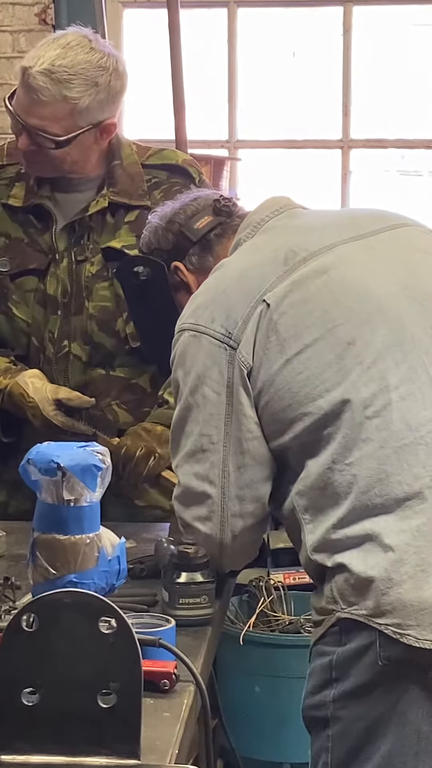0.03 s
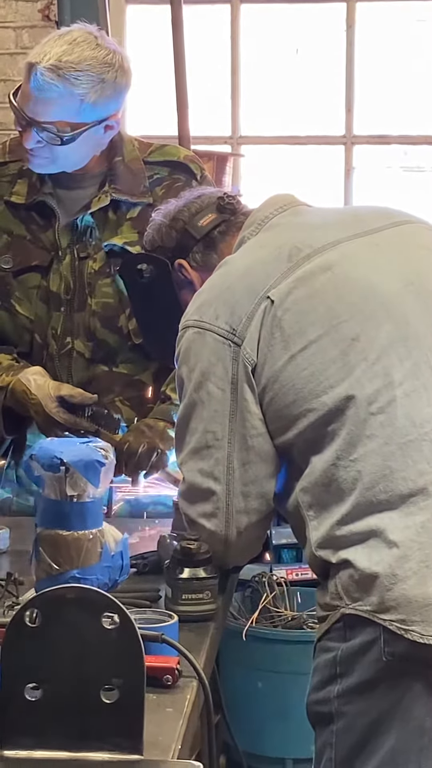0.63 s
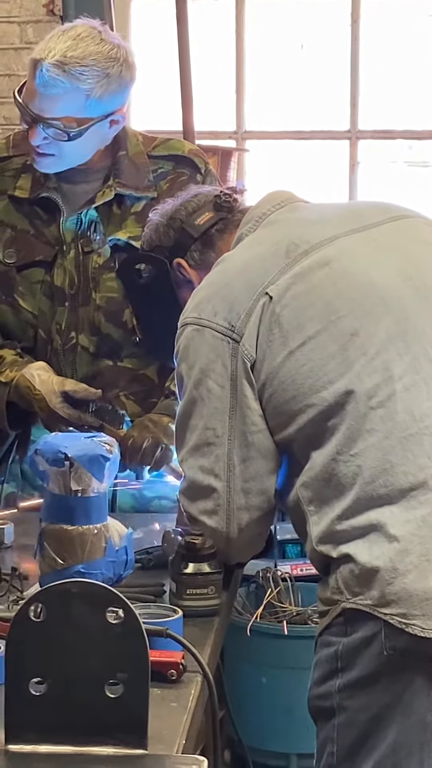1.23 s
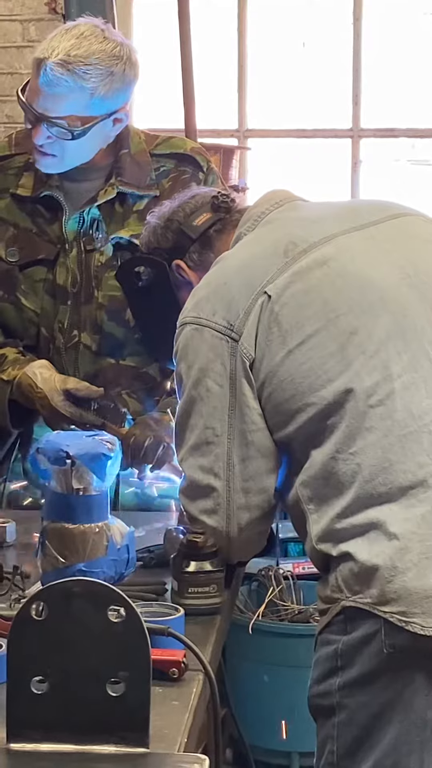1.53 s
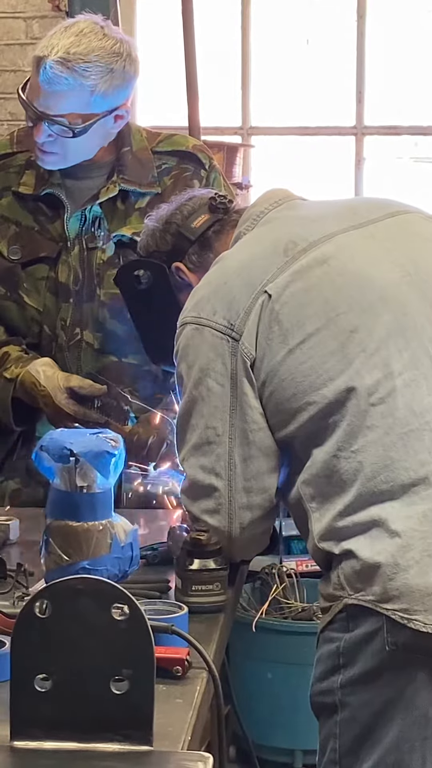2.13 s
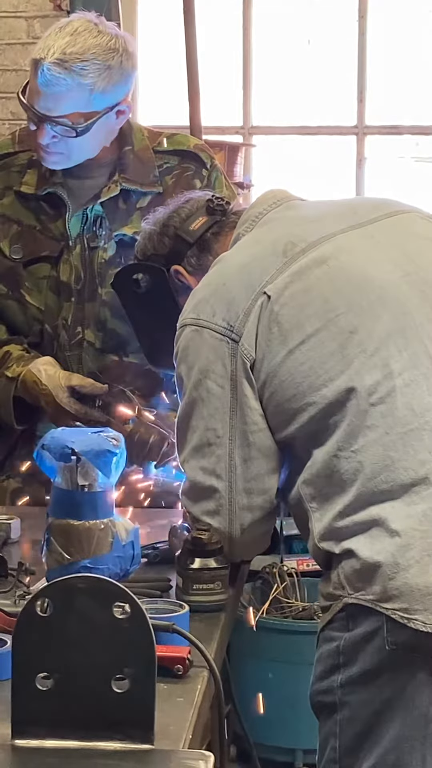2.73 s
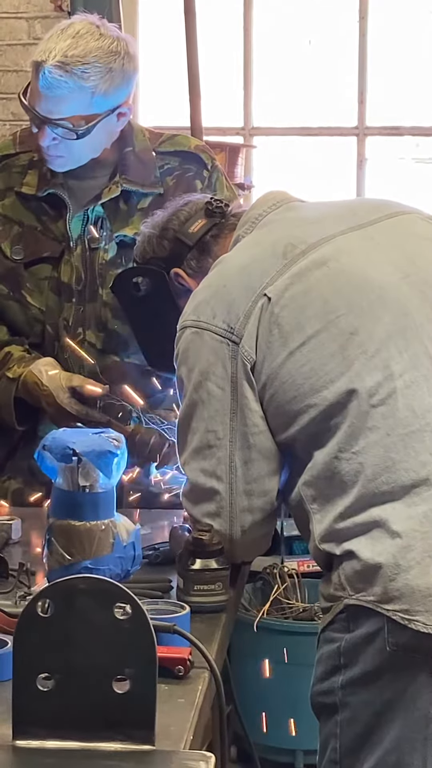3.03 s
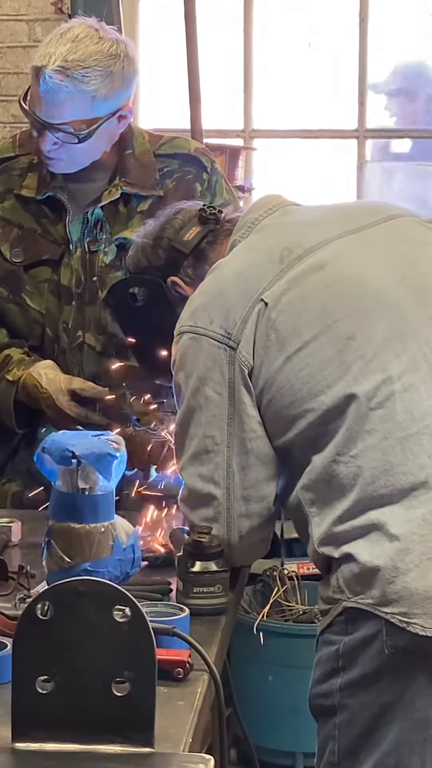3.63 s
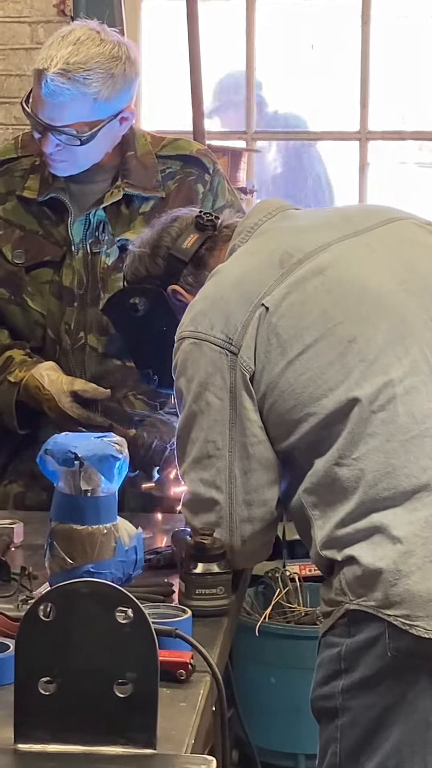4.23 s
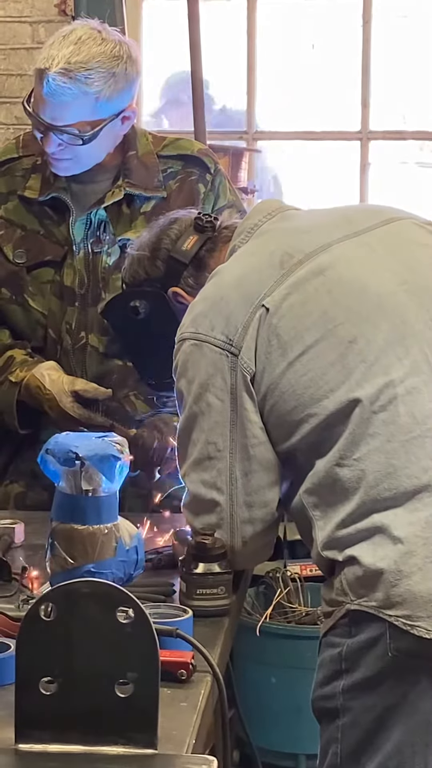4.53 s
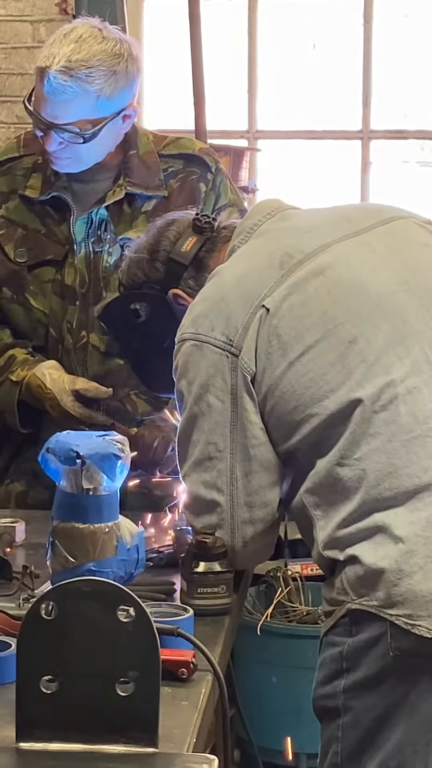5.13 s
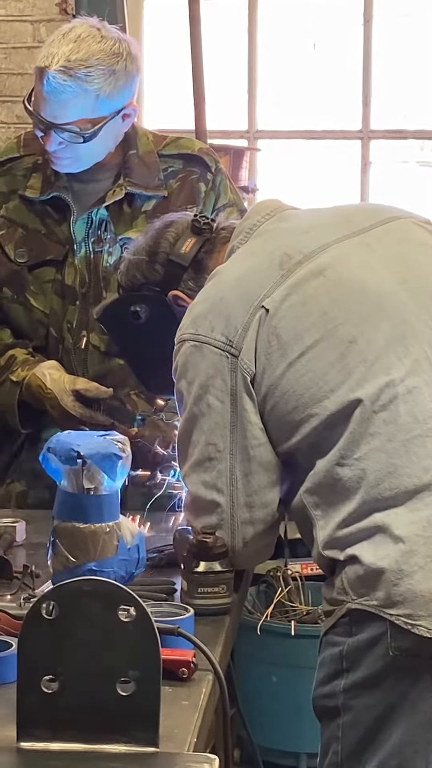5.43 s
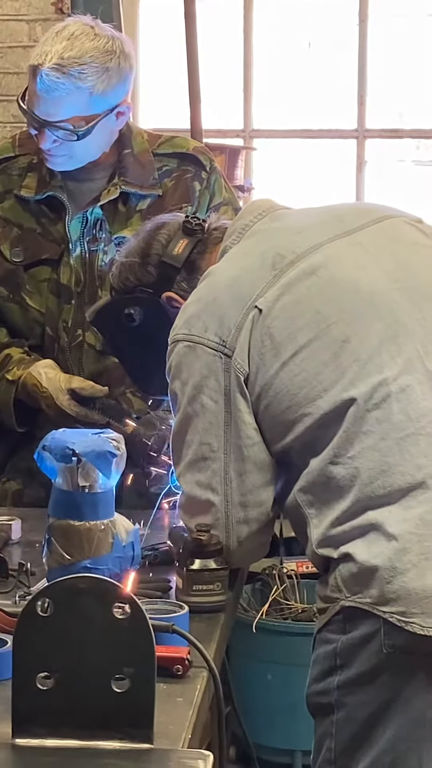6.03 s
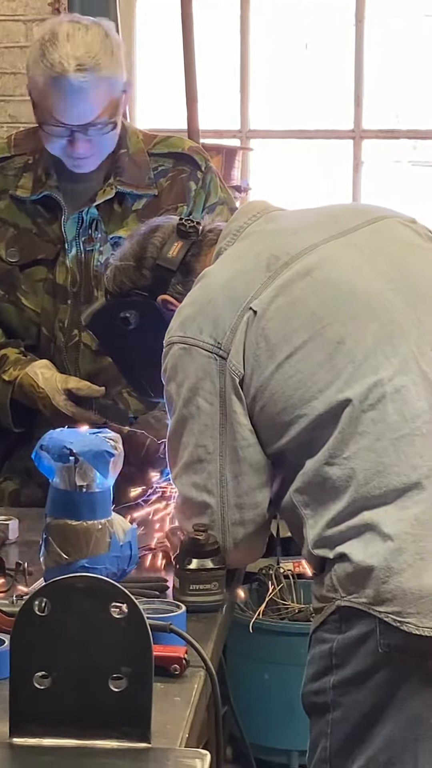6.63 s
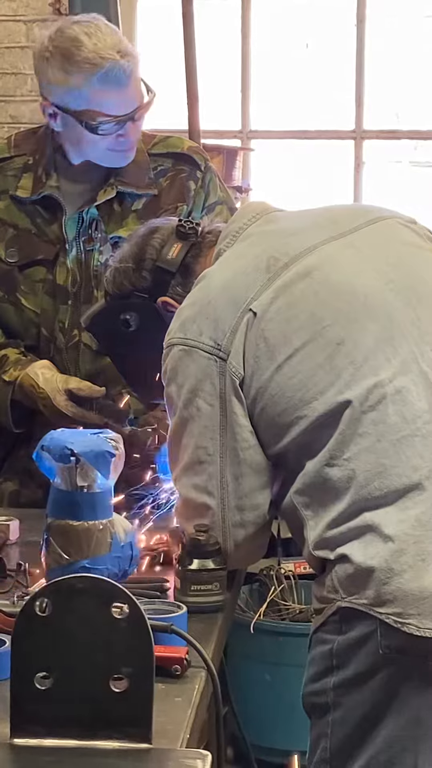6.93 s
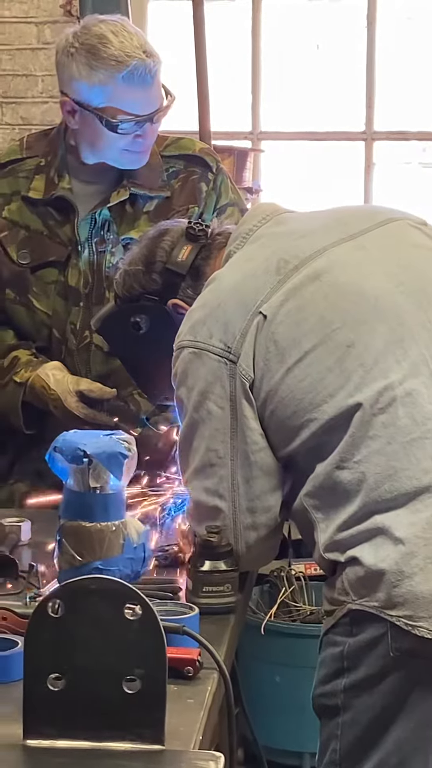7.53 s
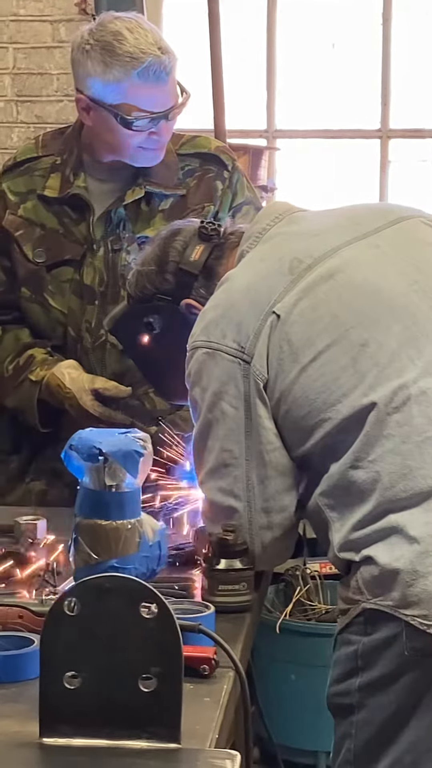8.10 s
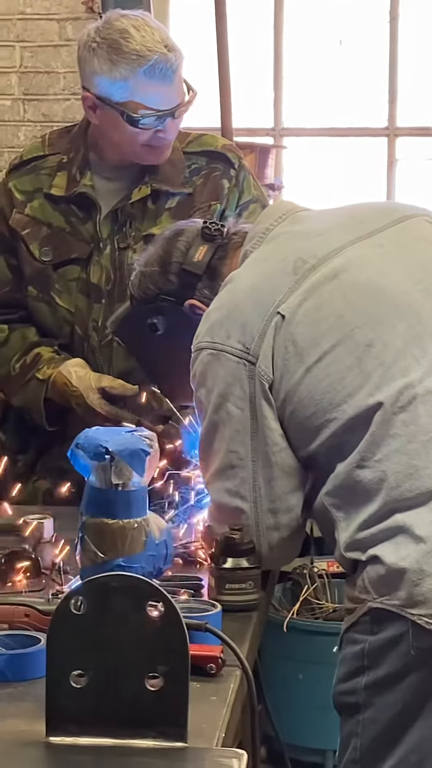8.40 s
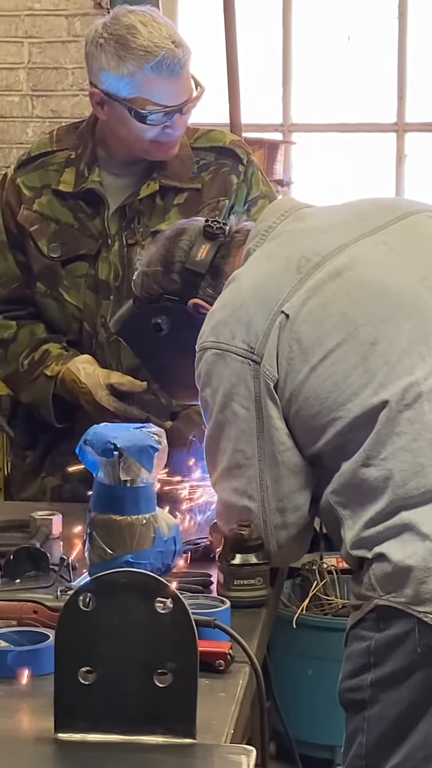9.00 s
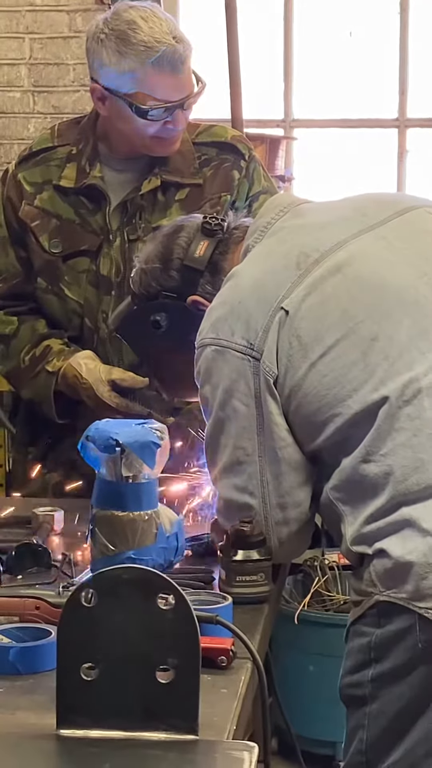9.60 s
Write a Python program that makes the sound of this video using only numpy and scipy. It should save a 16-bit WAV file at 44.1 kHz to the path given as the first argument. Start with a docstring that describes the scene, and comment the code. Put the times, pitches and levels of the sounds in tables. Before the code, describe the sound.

An electric welder strikes an arc and crackles and sizzles steadily, with popping spatter over a faint machine hum.

```python
"""A workshop with a steel bench. A wire welder strikes an arc and lays one long bead, half hidden behind
the person welding. Each short circuit snaps, the melt sizzles between snaps and drops of spatter burst.
Bench clutter scatters the crackle into the room; narrow resonances colour it. The machine's fan and a
motor hum underneath. A low thud dies away as the arc catches; fainter ones follow."""
import sys
import numpy as np
from scipy import signal
from scipy.fft import rfft, irfft, next_fast_len
from scipy.io import wavfile
from scipy.ndimage import uniform_filter1d

SR = 44100
rng = np.random.default_rng(int(sys.argv[2]) if len(sys.argv) > 2 else 0)


def unload_audio(sound):
    """Save the sound as a 16-bit wav file, at the path given as the first command line argument."""
    columns = np.transpose(np.atleast_2d(sound))
    # keep every value between -1 and 1, then stretch to whole-number steps
    steps = np.round(np.clip(columns, -1, 1) * 32767)
    wavfile.write(sys.argv[1], SR, steps.astype(np.int16))


N = 430416
TIME_S = np.arange(N) / SR
FFT_SIZE = next_fast_len(N + SR)
FREQ_HZ = np.fft.rfftfreq(FFT_SIZE, 1 / SR)

# Wire touches, arc goes out again. Each row: start in seconds, level in dB, fade in dB per second.
FALSE_STARTS = [(.123, -33, 450), (0.1438, -30, 108), (0.2255, -32.5, 69)]
# Steady burn. Each row: time in seconds, crackle level in dB, sputter level in dB.
BURN_LEVELS = [(0.4, -30.5, -34.5), (0.9, -32.5, -37), (2.3, -29.5, -37), (3.5, -32, -35), (4.1, -31, -39),
               (5.2, -29, -36.2), (7.3, -30, -38), (8.25, -32, -37), (8.7, -31, -36.5), (9.76, -27, -36)]
# Arc flares. Each row: peak time in seconds, width in seconds, crackle rise in dB, sputter rise in dB.
ARC_FLARES = [(0.87, 0.06, 0.5, 2.5), (1.184, 0.1, 4, 2.5), (1.493, 0.1, 1.5, 2.5), (1.844, 0.19, 2.5, 4),
              (2, 0.086, 5, 2.5), (2.6, 0.2, 2.5, 2.5), (2.928, 0.11, 4.5, 2.5), (3.172, 0.13, 3, 1.5),
              (3.308, 0.12, 7, 2.5), (3.444, 0.04, 8, 3.5), (3.633, 0.027, 9.5, -1), (3.67, 0.22, 1.5, 0.5),
              (4.08, 0.09, 1.5, 1), (4.745, 0.24, 2, 3.5), (5.48, 0.11, 0.5, 3.5), (5.703, 0.17, 2, 3),
              (5.96, 0.17, 0, 1.5), (6.2, 0.084, 3.5, 0.5), (6.276, 0.11, 3.5, 2.5), (6.4, 0.19, -1.5, 2.5),
              (6.623, 0.16, 3.5, 3.5), (6.965, 0.16, 2.5, 2.5), (7.12, 0.26, -0.5, 4.5),
              (7.23, 0.2, 1.8, 1.3), (7.488, 0.25, 4.5, 3.5), (7.648, 0.068, 2.5, 1), (7.948, 0.18, 3.5, 2),
              (8.088, 0.11, 7, 2), (8.474, 0.21, 2.5, 2.5), (8.624, 0.14, 6, 4.5), (8.985, 0.41, 4.5, 3),
              (9.287, 0.17, 3, 4.5)]
# Top treble against the rest of the crackle. Each row: time in seconds, gain in dB.
SPIT_GAINS = [(0.15, 3), (0.36, -5), (0.55, 3), (0.95, -1), (1.35, -3.5), (2.5, -4.5), (3.3, -2.5),
              (4.5, -2), (5.7, -1), (6.9, 1), (7.2, 0), (7.5, 0.7), (8.2, 0.5), (9.76, 0)]
# Spark colour. Each row: frequency in Hz, gain at bead start in dB, gain at bead end in dB.
SPARK_SPECTRUM = [(120, -14, -20.5), (356, -5, -3), (417, -6, -3.5), (458, -11.5, -7), (500, -4.5, -3),
                  (586, -5.5, -3), (693, 1.5, -3), (817, 2, 2), (1007, -5, -7), (1395, 0.8, 3),
                  (1720, -5, 1), (1980, -4.5, -2), (2180, -3.5, -2), (3130, -0.6, -0.2), (3660, -5.5, -1.5),
                  (3910, -1, -2.5), (4850, 0.8, -2.5), (5770, 2.5, -5), (7240, -1.5, -5), (8710, 3.5, 0.5),
                  (9900, -2, -3.5), (10560, -0.5, 2.5), (13100, -2, -8.5), (14800, -3, -6),
                  (15700, -8, -6.5)]
# Wire striking the plate, then large drops bursting. Each row: start in seconds, level in dB.
SPATTER_POPS = [ (0.1228, -11), (0.1447, 1), (0.2255, -11), (0.3218, -3), (0.3373, -6), (0.404, -6),
                (0.486, -6), (0.5345, -5), (0.6059, -6), (1.1536, -8), (1.1826, -6), (1.5012, -8),
                (1.9925, -6), (2.1213, -9), (2.1356, -7), (2.1845, -7), (2.5873, -7), (2.8446, -7),
                (2.9133, -7), (3.1457, -7), (3.6281, -6), (3.6382, -5), (5.4085, -8), (6.2795, -5),
                (6.5947, -7), (6.9797, -7), (7.379, -6), (7.4433, -8), (7.48, -5), (7.6363, -8),
                (7.9481, -7), (7.9632, -7), (8.0817, -5), (8.4551, -5), (8.5898, -8), (8.7139, -5),
                (8.8118, -6), (8.8781, -5), (8.955, -6), (9.3019, -5), (9.3768, -8), (9.421, -5),
                (9.5015, -8), (9.5178, -8), (9.6066, -4), (9.7256, -6)]
# Molten pool spitting. Each row: start in seconds, level in dB.
POOL_PLOPS = [(0.1228, -13), (0.1447, -8), (0.3373, -13), (0.8519, -13), (3.4441, -11), (3.6365, -11),
              (4.4947, -14), (6.2237, -12), (6.5633, -13), (7.2563, -12), (7.3287, -12), (7.3789, -12),
              (7.5588, -11), (7.6041, -12), (7.9629, -11), (8.0472, -12), (8.0817, -12), (8.5895, -10),
              (8.612, -12), (8.621, -12), (8.9546, -10), (9.0703, -11), (9.1225, -12), (9.286, -10),
              (9.4207, -12), (9.4634, -12), (9.5185, -13), (9.7258, -11)]
# Narrow resonances: steel ringing, plus evenly spaced treble peaks from a short echo.
# Each row: frequency in Hz, gain in dB, T60 in seconds.
RESONANCES = [(830, -11, .2), (1256, -6, .3), (1340, -10, .2), (1929, -3, .3), (2190, -8, .1),
              (2460, -10, .1), (3020, -12, .08), (3110, -12, .12), (3316, -3, .25), (8036, -5, .15),
              (8173, -8, .15), (8314, -8, .15), (8477, -9, .15), (8619, -7, .15), (8931, -4, .15),
              (9098, -8, .15), (9431, -3.5, .15)]
# Reflections off bench, vice, window and ceiling. Each row: delay in seconds, gain in dB.
HARD_ECHOES = [(.0014, -16.5), (.0021, -10.5), (.0043, -9.5), (.0067, -29), (0.0166, -3), (.029, -10.5)]
# Stereo image. Each row: frequency in Hz, left phase lead in radians, left-right likeness from 0 to 1.
STEREO_IMAGE = [(250, -.1, .99), (600, -.8, .55), (950, -1.2, .72), (1400, .2, .65), (2400, .5, .5),
                (3300, 2.6, .2), (4200, 2.3, .42), (5400, 3.1, .92), (5800, 3.16, .97), (6200, 3.5, .8),
                (7200, 5.1, .7), (7800, 6.25, .98), (9000, 6.3, .98), (10000, 7.6, .66), (11000, 8.9, .9),
                (11250, 9.42, .999), (12400, 9.43, .998), (12900, 9.7, .9), (13400, 10.9, .4),
                (14100, 12.55, .95)]
# Motor, fan tones, faint whines. Each row: frequency in Hz, level in dB, phase waver in radians.
MACHINE_TONES = [(58.7, -46, .12), (209.1, -53, .9), (261.7, -40.3, .2), (419.9, -59, 1.3),
                 (656.8, -59, .8), (786, -57.5, .6), (1076, -55.5, .6)]
# Two close fan tones that beat. Each row: frequency in Hz, level in dB, phase waver in radians.
THROB_TONES = [(314, -51.5, .7), (327.5, -52.5, .8)]
# The throb comes and goes. Each row: time in seconds, gain in dB.
THROB_GAINS = [(0.55, -2), (0.85, 6), (1.22, -3.5), (1.45, 1), (2.4, -1), (2.75, -6), (2.92, 0.5),
               (4.1, -4), (4.4, -1), (5.03, -4), (5.25, 3), (5.55, 7), (5.8, 0.5), (6.85, -0.5), (7.35, 6),
               (7.65, -2), (8.65, 2), (8.87, -4), (9.2, 4), (9.6, -4)]
# Air rushing through the case. Each row: frequency in Hz, gain in dB.
AIR_SPECTRUM = [(15, -40), (32, -32), (48, -24), (100, -6), (150, -5), (205, 0), (245, -3), (290, -2),
                (322, 1), (355, -7), (460, -16.5), (750, -7.5), (2000, -11), (6000, -37), (16000, -59)]
# Dull bumps. Each row: start in seconds, level in dB, T60 in seconds.
THUD_EVENTS = [(0, -22.5, 0.52), (0.159, -33.5, 0.96), (1.78, -45, 2.5), (2.08, -59, 1.9), (9.32, -38, 0.8)]
# Bump colour. Each row: frequency in Hz, gain in dB.
THUD_SPECTRUM = [(12, -24), (30, -5), (65, 6), (110, -3.5), (160, -6.5), (260, -2), (500, -12), (1200, -18),
                 (4000, -41.5)]

CATCH_S, SETTLE_S, START_SPUTTER_DB = 0.323, 0.024, -4.5  # the arc holds from CATCH_S on
DIP_HZ, DIP_JITTER, DIP_DB = 73.9, 0.25, 4.5  # the wire dips into the pool at a loose rate
UNREST_DB, UNREST_HZ = 0.72, 30
SPIT_DECAY_S, SPIT_ABOVE_HZ, SPIT_SPREAD_DB = 0.0017, 13300, 6
SPUTTER_BELOW_HZ, SPUTTER_FLUTTER_SHARE = 5200, 0.65
TICKS_PER_S, TICK_DB = 28, -13
DIRECT_DB, ABSORB_HZ, BAND_LIMIT_HZ = -5.5, 10500, 15850


def arc(crackle_db, sputter_db, crack_db, sizzle_db, boil_db, spit_db):
    """The wire shorts and blows free with a snap; the melt sizzles; each dip spits in the top treble."""
    dip_rate_hz = DIP_HZ * (1 + DIP_JITTER * wander(hz=DIP_HZ / 2))
    dip_index, dip_phase = np.divmod(np.cumsum(dip_rate_hz) / SR, 1)
    shorts = clicks(per_s=300, spread_db=3.1)
    snaps = unit(burst(shorts, decay_s=0.00048)) + amp(crack_db) * unit(shorts)
    sizzle = unit(clicks(per_s=4000, spread_db=2.5) * rng.choice([-1, 1], N))
    crackle = steady(flicker(snaps + amp(sizzle_db) * sizzle, snap_db=2.5, drift_db=0.5))
    sputter = steady(snaps + amp(boil_db) * sizzle)  # the pool boiling
    crackle_gain, sputter_gain = burn_envelopes(dip_phase)
    crackle = crackle * crackle_gain * amp(crackle_db)
    sputter = sputter * sputter_gain * amp(sputter_db)
    drop_size = amp(SPIT_SPREAD_DB * rng.uniform(-1, 1, N))[dip_index.astype(int)]
    puff = unit(drop_size * np.exp(-dip_phase / (DIP_HZ * SPIT_DECAY_S)) * rng.standard_normal(N))
    spits = (crackle + amp(spit_db + crackle_db) * crackle_gain * puff) / np.sqrt(1 + amp(2 * spit_db))
    spits *= gain_curve(SPIT_GAINS)
    low_band = lowpass(SPUTTER_BELOW_HZ)
    top_band = 1 - lowpass(SPIT_ABOVE_HZ, order=16)
    return shape(crackle, 1 - low_band - top_band) + shape(spits, top_band) + shape(sputter, low_band)


def burn_envelopes(dip_phase):
    """Crackle and sputter gains: false starts, then an uneven burn that flares, and jumps at each dip."""
    starts = sum((TIME_S >= at_s) * amp(db - db_per_s * abs(TIME_S - at_s))
                 for at_s, db, db_per_s in FALSE_STARTS) * amp([[0], [START_SPUTTER_DB]])
    times_s, *levels_db = np.transpose(BURN_LEVELS)
    onset = np.sqrt(np.clip((TIME_S - CATCH_S) / SETTLE_S, 0, 1))
    held = onset * amp([np.interp(TIME_S, times_s, db) for db in levels_db])
    coarse_s = TIME_S[::64]
    flares_db = sum(np.outer(rises_db, np.exp(-(2 * (coarse_s - at_s) / width_s) ** 2))
                    for at_s, width_s, *rises_db in ARC_FLARES)
    flares = amp([np.interp(TIME_S, coarse_s, db) for db in flares_db])
    flutter_db = UNREST_DB * wander(hz=UNREST_HZ) + DIP_DB * (0.5 - dip_phase)
    return (starts + held) * flares * amp([flutter_db, SPUTTER_FLUTTER_SHARE * flutter_db])


def flicker(x, snap_db, drift_db):
    """Colour varies from snap to snap and drifts as the pool moves. Depths apply at 10 kHz."""
    hz, _, frames = signal.stft(x, SR, nperseg=128)
    fast, slow = uniform_filter1d(rng.standard_normal((2, *frames.shape)), size=5, axis=1)
    patches_db = snap_db * unit(uniform_filter1d(fast, size=3))
    patches_db += drift_db * unit(uniform_filter1d(slow, size=70))
    frames *= amp(patches_db * np.sqrt(hz[:, None] / 10000))
    return unit(signal.istft(frames, SR, nperseg=128)[1][:N])


def bead(sparks, scatter_slope_db, end_scatter_db, spots):
    """The torch passes a row of spots, each with its own colour and reflections."""
    start_db, end_db = spectrum(SPARK_SPECTRUM)
    position = (spots - 1) * TIME_S / TIME_S[-1]
    weld = 0
    for spot, along in enumerate(np.linspace(0, 1, spots)):
        share = np.cos(np.pi / 2 * np.minimum(abs(position - spot), 1))
        colour_db = (1 - along) * start_db + along * end_db
        scatter_db = end_scatter_db - (1 - along) * scatter_slope_db
        weld += workshop(sparks * share, colour_db, scatter_db)
    return weld / np.sqrt(1 + 0.23 * abs(np.sin(np.pi * position)))  # neighbours share the direct sound


def spatter(pop_db, plop_db):
    """Drops burst brightly, the pool plops dully, and fine spatter ticks while the arc holds."""
    ticks = amp(TICK_DB) * clicks(per_s=TICKS_PER_S, spread_db=-1.5) * (TIME_S >= CATCH_S)
    cracks = shape(amp(pop_db) * puffs(SPATTER_POPS) + ticks, FREQ_HZ / (FREQ_HZ + 2500))
    plops = shape(amp(plop_db) * puffs(POOL_PLOPS), lowpass(hz=4000))
    return cracks + plops


def puffs(rows):
    """A click and a short puff of noise per row."""
    hits = np.zeros(N)
    for start_s, db in rows:
        hits[int(start_s * SR)] = amp(db)
    return hits + 0.33 * burst(hits, decay_s=0.0015)


def workshop(x, colour_db, scatter_db, echo_db=0):
    """Carries one spot to left and right, which differ in phase and in their reflections."""
    near = room_response(bench_db=scatter_db, room_db=scatter_db + 4, echo_db=echo_db)
    diffuse = 1j * room_response(bench_db=scatter_db + 23, room_db=scatter_db + 12, echo_db=echo_db)
    lead_rad, likeness = spectrum(STEREO_IMAGE)
    right = (likeness * near + np.sqrt(1 - likeness ** 2) * diffuse) * np.exp(-1j * lead_rad)
    left = near * amp(-1.8 * np.exp(-np.log((FREQ_HZ + 1) / 1300) ** 2))  # weaker mids
    return shape(x, np.array([left, right]) * amp(colour_db) * resonances())


def resonances():
    """Steel ringing and a short echo's treble peaks, added to a flat response."""
    return 1 + sum(amp(db) / (1 + 2j * np.pi * (FREQ_HZ - hz) * t60_s / np.log(1000))
                   for hz, db, t60_s in RESONANCES)


def room_response(bench_db, room_db, echo_db):
    """Direct sound plus duller bench scatter, room tail and hard echoes."""
    impulse = amp(bench_db) * scatter(t60_s=0.12, rise_s=0.00053)
    impulse += amp(room_db) * scatter(t60_s=0.62, rise_s=0.0029)
    for delay_s, db in HARD_ECHOES:
        impulse[int(delay_s * SR * rng.uniform(0.97, 1.03))] += amp(db + echo_db)
    impulse = signal.sosfilt(signal.butter(1, ABSORB_HZ, fs=SR, output="sos"), impulse)
    impulse[0] += amp(DIRECT_DB)
    return rfft(flatten(impulse), FFT_SIZE)


def scatter(t60_s, rise_s):
    """Dense reflections of energy 1 that build and decay, treble first."""
    age_s = TIME_S[:SR // 2]
    hz, frame_s, frames = signal.stft(rng.standard_normal(len(age_s)), SR, nperseg=64)
    frames *= amp(-60 * frame_s / t60_s * (1 + hz[:, None] / 14000))
    frames /= np.sqrt((abs(frames) ** 2).sum(1, keepdims=True))
    tail = signal.istft(frames, SR, nperseg=64)[1][:len(age_s)] * (1 - np.exp(-age_s / rise_s))
    return tail / np.linalg.norm(tail)


def flatten(impulse, size=32768):
    """Minimum-phase levelling, finest below the treble, so echoes do not ring hollow."""
    gain, hz = rfft(impulse, size), np.fft.rfftfreq(size, 1 / SR)
    power = abs(gain) ** 2
    smoothed = np.where(hz < 4000, uniform_filter1d(power, size=70), uniform_filter1d(power, size=240))
    cepstrum = irfft(-np.log(abs(smoothed) + 1e-12))[:size // 2]
    cepstrum[0] /= 2
    return irfft(gain * np.exp(rfft(cepstrum, size)))


def machine(air_db, left_db):
    """Motor and fan tones, two of them beating, in a rush of cooling air."""
    tones = hum(MACHINE_TONES) + hum(THROB_TONES) * gain_curve(THROB_GAINS)
    mid, side = rng.standard_normal((2, N))
    side = shape(side, FREQ_HZ / (FREQ_HZ + 1100))  # bass reaches both sides alike
    air = unit(shape(np.array([mid + side, mid - side]), amp(spectrum(AIR_SPECTRUM))))
    return (tones + amp(air_db) * air) * amp([[left_db], [-left_db]])


def hum(rows):
    """Machine tones wavering in phase and level."""
    tones = 0
    for hz, db, waver_rad in rows:
        phase_rad = 2 * np.pi * (hz * TIME_S + rng.random()) + waver_rad * wander(hz=3.06)
        tones += np.sqrt(2) * np.sin(phase_rad) * amp(db + 0.87 * wander(hz=3.5))
    return tones


def thuds():
    """Dull low bumps dying away in the room."""
    envelope = sum(amp(db - 60 * abs(TIME_S - at_s) / t60_s) * np.clip((TIME_S - at_s) / 0.0017, 0, 1)
                   for at_s, db, t60_s in THUD_EVENTS)
    return envelope * unit(shape(rng.standard_normal(N), amp(spectrum(THUD_SPECTRUM))))


def clicks(per_s, spread_db):
    """Randomly timed clicks; most near size 1, a few up to 4 * spread_db from it."""
    chance, size = rng.random(N), np.minimum(rng.exponential(1, N), 4)
    return (chance < per_s / SR) * amp(spread_db * size)


def burst(triggers, decay_s):
    """A decaying puff of noise per trigger."""
    power = signal.lfilter([1], [1, -np.exp(-2 / (decay_s * SR))], triggers ** 2)
    return np.sqrt(power) * rng.standard_normal(N)


def steady(x):
    """Holds mean power at 1; single clicks still stand out."""
    return x / np.sqrt(abs(uniform_filter1d(x ** 2, size=1200)) + 1e-9)


def wander(hz, points=4096):
    """Random drift of rms 1, up to the given rate."""
    rates_hz = np.fft.rfftfreq(points, TIME_S[-1] / points)
    drift = irfft(rfft(rng.standard_normal(points)) / (1 + (rates_hz / hz) ** 4))
    return unit(np.interp(TIME_S, np.linspace(0, TIME_S[-1], points), drift))


def gain_curve(table):
    """Gain per sample from rows of seconds and dB."""
    return amp(np.interp(TIME_S, *np.transpose(table)))


def spectrum(table):
    """Table columns interpolated over log frequency."""
    hz, *columns = np.transpose(table)
    return np.squeeze([np.interp(np.log(FREQ_HZ + 1), np.log(hz + 1), column) for column in columns])


def lowpass(hz, order=4):
    """Low-pass gain per frequency."""
    return 1 / (1 + (FREQ_HZ / hz) ** order)


def shape(x, gain):
    """Filters by a gain per frequency."""
    return irfft(rfft(x, FFT_SIZE) * gain, FFT_SIZE)[..., :N]


def amp(db):
    """Decibels to gain."""
    return 10 ** (np.asarray(db) / 20)


def unit(x):
    """Scales to rms 1."""
    return x / np.sqrt(np.mean(x ** 2) + 1e-20)


def scene():
    """The travelling arc and its spatter, over machine hum and thuds."""
    sparks = arc(crackle_db=7.5, sputter_db=12, crack_db=-6.5, sizzle_db=3.5, boil_db=1.5, spit_db=-3.5)
    weld = bead(sparks, scatter_slope_db=6.5, end_scatter_db=-3.5, spots=4)
    drops = spatter(pop_db=5.5, plop_db=10.5)
    # drops fly into the open, so they sound drier
    pops = workshop(drops, colour_db=spectrum(SPARK_SPECTRUM)[0], scatter_db=-9, echo_db=-7)
    return weld + pops + machine(air_db=-41, left_db=0.5) + thuds()


def record(dry):
    """Steep low-pass at the band limit."""
    taps = signal.firwin(511, BAND_LIMIT_HZ, window=("kaiser", 9), fs=SR)
    return signal.oaconvolve(dry, taps[None], "same")


dry = scene()
out = record(dry)
unload_audio(out)
```